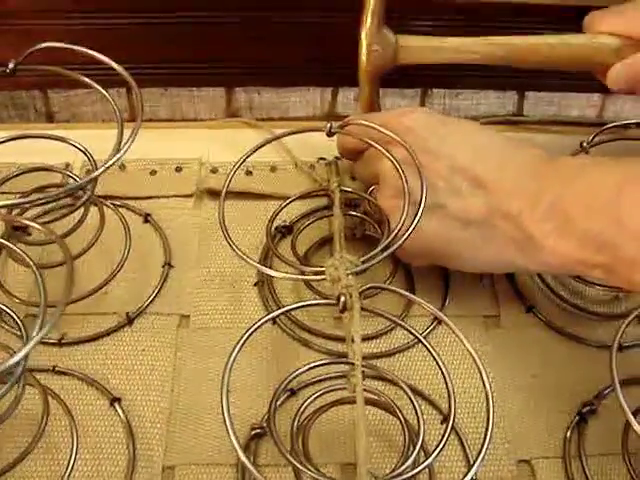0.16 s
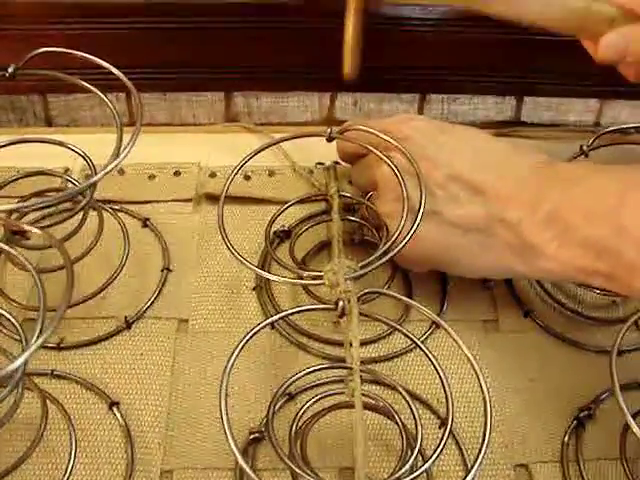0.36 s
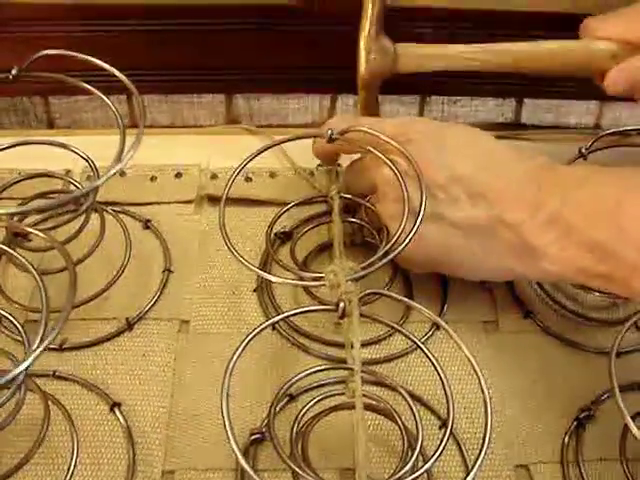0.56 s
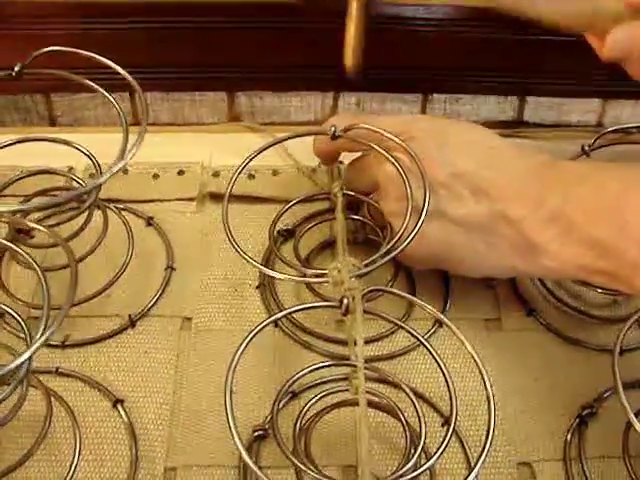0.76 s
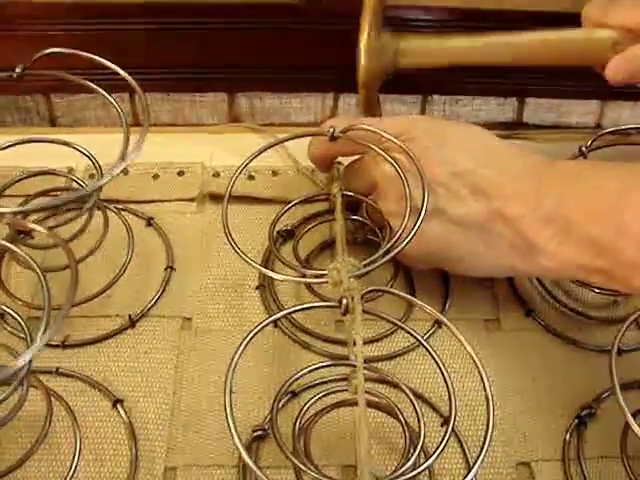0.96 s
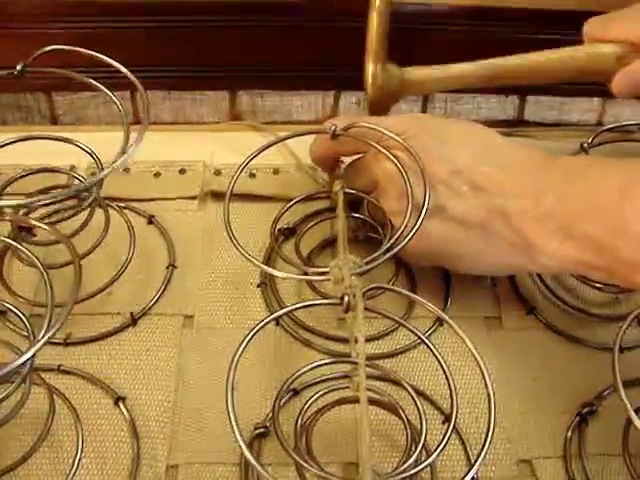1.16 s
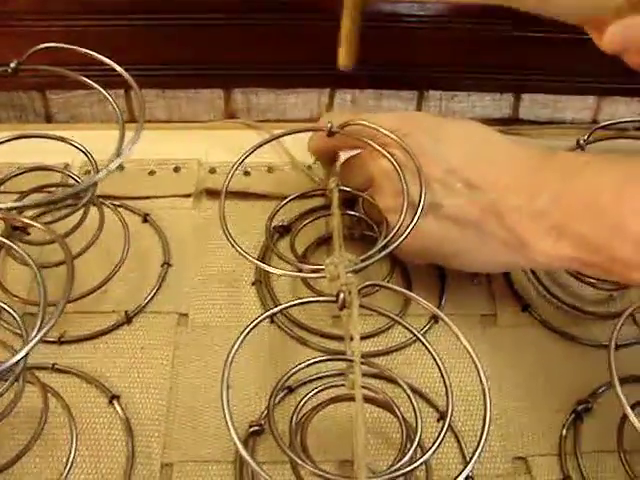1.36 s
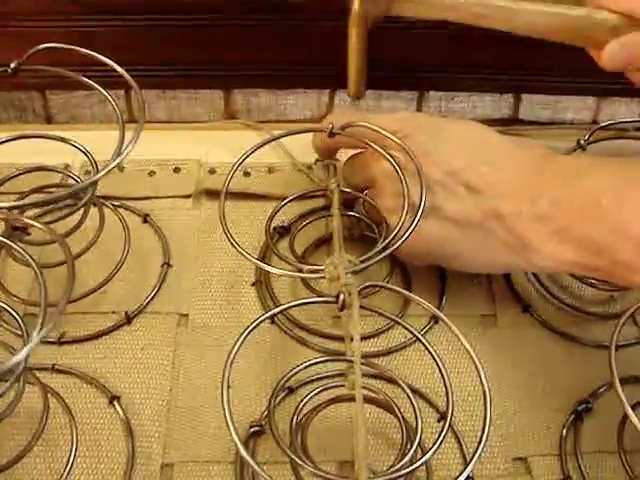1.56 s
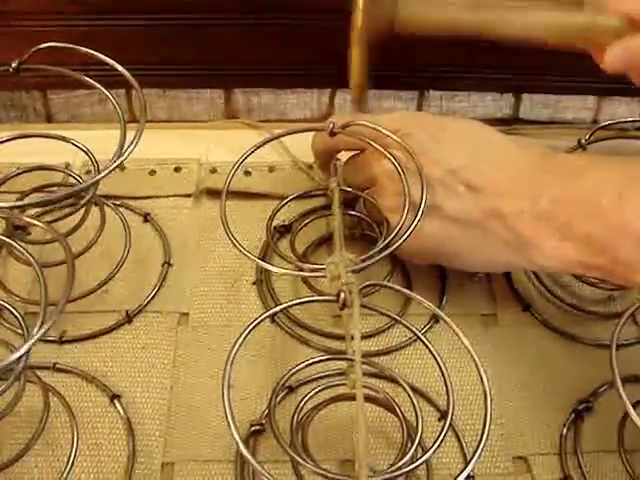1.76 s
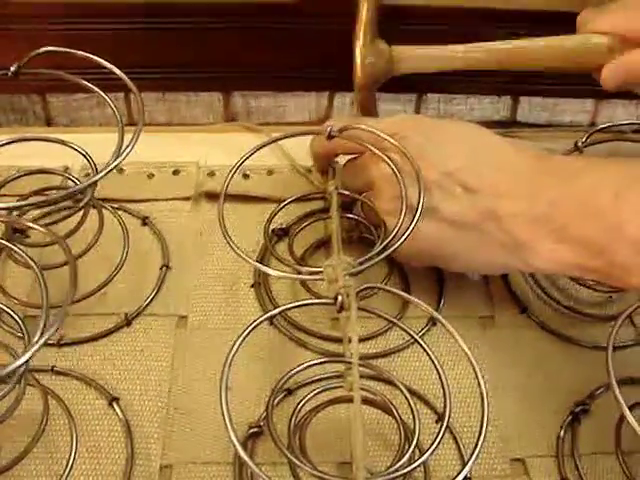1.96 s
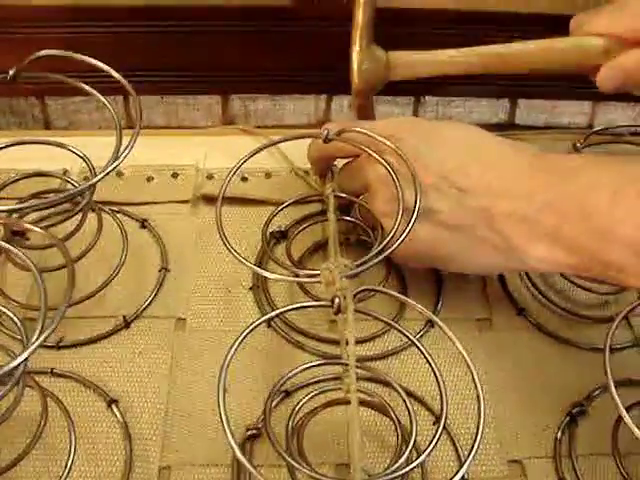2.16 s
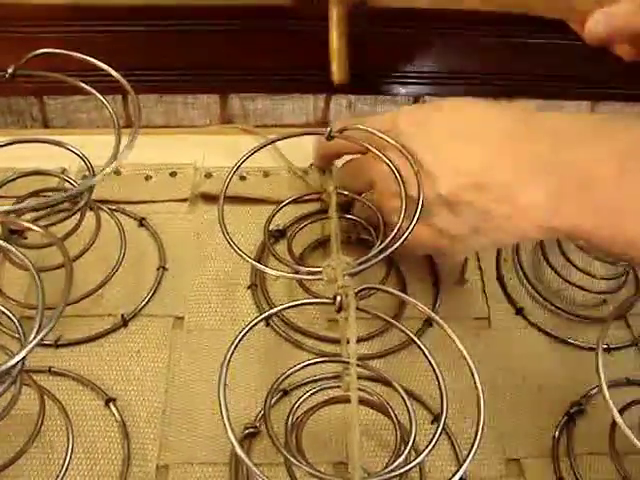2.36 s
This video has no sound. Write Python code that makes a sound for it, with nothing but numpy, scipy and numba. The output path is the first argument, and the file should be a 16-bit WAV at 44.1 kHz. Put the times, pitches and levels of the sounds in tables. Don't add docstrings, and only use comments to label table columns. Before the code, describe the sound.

A hammer drives a tack into a wooden frame with blows at about 0.2, 0.6, 1.0, 1.25, 1.75, 2.0 and 2.25 seconds, the third loudest. Each gives a steely crack, a quick rebound and a short hollow wooden ring. Coil springs hum and tick faintly between; something is lightly nudged near 1.5. Close, compressed camera sound with dull treble and low workshop hum.

```python
import sys
import numpy as np
from scipy import signal
from scipy.io import wavfile
from scipy.ndimage import uniform_filter1d, minimum_filter1d
from numba import njit

SR = 44100
rng = np.random.default_rng(int(sys.argv[2]) if len(sys.argv) > 2 else 0)


def master_out(mix):
    frames = np.transpose(np.atleast_2d(mix))
    ceiling = np.clip(frames, -1, 1)
    pcm = np.round(ceiling * 32767).astype(np.int16)
    wavfile.write(sys.argv[1], SR, pcm)


def volts_from_decibels(level):
    exponent = np.asarray(level, float) / 20
    return 10 ** exponent


N = 109941

# [f/Hz, level/dB per Hz]
SHOP_SPECTRUM = [(18, -46), (30, -9), (101, -10), (325, 0), (468, -14.5), (742, -9.5), (859, -14.5),
                 (1870, -19), (10000, -33.5), (13000, -64.5), (22000, -120)]
# [f/Hz, level/dB, t60/s]
SPRING_MODES = [(264, -15.5, 1.), (325.8, 10, 0.97), (345, -4, 0.67), (616, -10, 2.1), (749, -2.5, 1.73),
                (766, -13, 0.8), (1122, -0.5, .9), (1320, -10, 1.7), (1550, -9.5, .9)]
# [t/s, level/dB]
TICK_TIMES = [(0.0392, -47.5), (0.0708, -43), (0.118, -55), (0.148, -49.5), (0.381, -56), (0.465, -50),
              (0.5022, -50), (0.5563, -60), (0.803, -52), (0.861, -47.5), (0.8942, -49.5), (0.9243, -46),
              (1.179, -43), (1.41, -50), (1.487, -51), (1.6024, -48.5), (1.6636, -60), (1.912, -63),
              (2.1337, -50), (2.202, -47), (2.423, -47)]
# [f/Hz, level/dB, t60/s]
TICK_MODES = [(1825, 3, .012), (2200, 0, .008), (2580, 1, .009), (2990, -2, .008), (3310, 3, .014)]
# [t/s, level/dB, bass level/dB, middle level/dB, treble level/dB]
HAMMER_BLOWS = [
    (0.2052, -12, 4, 2, -0.5),
    (0.6333, -9, 2, -3, -0.5),
    (0.9693, -7.5, -1.5, -3, -2.5),
    (1.247, -9, -3.5, 2.5, 0.5),
    (1.7398, -11.5, -2, 1, -3.5),
    (1.9921, -8.5, -2.5, -0.5, -1),
    (2.2446, -8.5, -4.5, -6, 1),
]
# [crack level/dB, echo delay t/s, echo level/dB]
BLOW_STRIKES = [
    (1.5, .019, -1),
    (1, .0175, -4),
    (-0.5, .017, -3),
    (-0.5, .016, -3.5),
    (4, 0.016, -9.5),
    (1, .018, -4),
    (-1, .0185, -3),
]
# [f/Hz, level/dB]
BLOW_FAVOURS = [
    [(711, -15.5), (851, -18), (1070, -20.5), (2100, -18)],
    [(581, -18.5), (1080, -13.5), (1290, -13), (1710, -21)],
    [(484, -16), (861, -13), (1080, -19.5), (1580, -20)],
    [(563.7, -12), (820, -11.5), (1537, -16), (705, -21)],
    [(568, -11), (820, -12), (1565, -8), (362.3, -19)],
    [(345, -9.5), (700, -11.5), (851, -10.5), (1230, -14)],
    [(861, -14), (1070, -15.5), (1290, -17), (1570, -10.5)],
]
# [delay t/s, width t/s, level/dB]
PRESSURE_PULSES = [
    (0, 0.00059, -2),
    (.0024, .0015, -1.5),
]
# [f/Hz, level/dB, t60/s]
CRACK_MODES = [(1600, 3, 0.038), (2702, 5, 0.036), (2157, -2.5, .03), (3520, -1.5, 0.04), (3887, -4, 0.034),
               (4910, -6.5, 0.024), (6360, -9, 0.025), (7830, -9, 0.018)]
# [f/Hz, level/dB, t60/s]
RAIL_MODES = [(120, -14.5, 0.21), (206.6, 3, 0.11), (259.3, 6, .17), (323.5, -2.5, 0.21),
              (360.6, 0.5, 0.13), (442, -5, 0.27), (556.6, -7.5, 0.26), (695.7, -2.5, 0.13),
              (834.3, -3.5, 0.18), (1026, -19, 0.35), (1076, -8, 0.22), (1297, -5, 0.14), (1520, -7.5, 0.2),
              (1560, -9.5, 0.23)]
# [f/Hz, level/dB per Hz]
TAIL_SPECTRUM = [(18, -60), (30, -57.5), (146, -6), (249, -7.5), (760, -4), (1000, -6.5), (1150, -10),
                 (1540, -8), (10000, -34), (13000, -87), (22000, -120)]
# [f/Hz, t60/s]
TAIL_DECAY = [(60, 0.51), (260, 0.33), (700, 0.24), (1840, 0.25), (4850, 0.19), (9000, .2)]
# [f/Hz, level/dB, t60/s]
HEAD_MODES = [(6330, -0.5, .02), (7640, -9, 0.01), (4700, -13, .01)]
# [delay t/s, level/dB]
HEAD_ECHOES = [
    (.007, -30.5),
    (.0132, -20),
    (.0158, -26),
]
# [t/s, level/dB, centre f/Hz, length t/s]
GLANCING_TOUCHES = [
    (0.24, -25, 7500, 0.003),
    (1.2402, -15.5, 4030, 0.0028),
    (1.2537, -21.5, 4950, 0.0014),
    (.6405, -29, 9500, .0015),
    (1.7470, -27.5, 5100, 0.0022),
    (2.0005, -23.5, 3100, 0.0021),
    (.9772, -35, 5900, 0.0018),
]
# [f/Hz, level/dB, t60/s]
NUDGE_MODES = [(814.9, 4, 0.079), (1200, -2.5, 0.065), (1466, 1.5, 0.078), (2210, 3, 0.022),
               (2770, 3, 0.015), (3990, -5, 0.008), (5700, -2, .012), (8900, -18, 0.0083)]
# [from t/s, to t/s]
HUSHES = [
    (0.1792, 0.2),
    (0.612, 0.63),
    (0.936, 0.9645),
    (1.2254, 1.2345),
    (1.7296, 1.7345),
    (1.98, 1.986),
    (2.232, 2.234),
]
# [from t/s, to t/s, above f/Hz]
TREBLE_HOLES = [
    (.2435, .2515, 6200),
    (.677, .683, 5500),
    (.712, .718, 5000),
    (.990, .998, 6500),
    (1.5305, 1.5475, 5600),
    (1.7935, 1.8010, 5000),
]

CRACK_DB, SNAP_DB, RAIL_DB, TAIL_DB, SPRINGS_DB, THUMP_DB = -4, -14.5, -7, -8.5, -32.5, -28


def curve(table, hz):
    points = np.array(table)
    return np.interp(np.log(hz), np.log(points[:, 0]), points[:, 1])


def bandpass(low_hz, high_hz, x):
    return signal.sosfilt(signal.butter(2, [low_hz, high_hz], "band", fs=SR, output="sos"), x)


def band(hz, size):
    return bandpass(hz / 2 ** (1 / 6), hz * 2 ** (1 / 6), rng.standard_normal(size))


def add(out, s, x):
    i = int(round(s * SR))
    if i < 0:
        x, i = x[-i:], 0
    out[i:i + len(x)] += x[:N - i]


def colour(hz, bass_db, mid_db, treble_db):
    return curve([(380, bass_db), (520, mid_db), (880, mid_db), (1050, 0), (1800, 0), (2800, treble_db)], hz)


def ring(modes, size, build_cycles=0., tone=(0, 0, 0)):
    t, m = np.arange(size) / SR, np.array(modes, float)
    chance = rng.standard_normal((len(m), 3))
    hz = (m[:, 0] * (1 + 0.00507 * chance[:, 0]))[:, None]
    gain = volts_from_decibels(m[:, 1] + 1.5 * chance[:, 1] + colour(m[:, 0], *tone))[:, None]
    decay = np.exp(-np.log(1000) * t / m[:, 2:])
    build = 1 - np.exp(-t * hz / (build_cycles + 1e-3))
    phase = 3 * min(build_cycles, 1) * chance[:, 2:]
    return (gain * decay * build * np.sin(2 * np.pi * hz * t + phase)).sum(axis=0) / 2


def contact(x, s):
    burst = rng.standard_normal(500) * np.exp(-np.arange(500) / SR / s)
    return signal.fftconvolve(x, burst / np.sqrt(np.sum(burst ** 2)))[:len(x)]


def shop():
    level_db, flicker_db, rumble_swell_db, swell_s = -49.5, 2.1, 4, 3.0
    out, swell = 0, np.cos(2 * np.pi * (np.arange(N) / SR - .4) / swell_s)
    for hz in 32 * 2 ** (np.arange(26) / 3):
        steps = np.repeat(rng.standard_normal(N // 1500 + 1), 1500)
        flicker = flicker_db * uniform_filter1d(steps, 1500)[:N]
        rumble = curve([(100, rumble_swell_db), (300, 0.013)], hz) * swell
        out = out + volts_from_decibels(curve(SHOP_SPECTRUM, hz) + flicker + rumble) * band(hz, N)
    return out * volts_from_decibels(level_db) / np.std(out)


def springs(build_cycles, tone=(0, 0, 0)):
    return volts_from_decibels(SPRINGS_DB) * ring(SPRING_MODES, 45000, build_cycles=build_cycles, tone=tone)


def ticks():
    out = np.zeros(N)
    for s, db in TICK_TIMES:
        add(out, s, volts_from_decibels(db + 3) * contact(ring(TICK_MODES, 3000), .0015))
    return out


def smear(size=400):
    growth_s = 0.0017
    bright = np.diff(rng.standard_normal(size + 1)) * 0.042
    middle = (band(2400., 900) + band(3300., 900) + band(1500., 900))[-size:] * 0.5
    return np.exp(-np.arange(size)[::-1] / SR / growth_s) * (bright + middle)


def push():
    t, pulses = np.arange(800) / SR, 0
    for late_s, width_s, db in PRESSURE_PULSES:
        pulses = pulses + volts_from_decibels(db) * np.sin(np.pi * np.clip((t - late_s) / width_s, 0, 1)) ** 2
    return signal.sosfilt(signal.butter(2, 260, "high", fs=SR, output="sos"), pulses)


def crack(tone):
    t, dwell_s, after_db = np.arange(3000) / SR, 0.0032, -12
    swell = 1 - np.exp(-t / 0.00044)
    bearing = volts_from_decibels(after_db) + np.exp(-(t / dwell_s) ** 4)
    return ring(CRACK_MODES, 3000, tone=tone) * swell * bearing


def snap(hz, length_s):
    t = np.arange(600) / SR
    hiss = bandpass(hz / 1.6, hz * 1.55, rng.standard_normal(600))
    return hiss / np.std(hiss) * np.exp(-(t / length_s) ** 2)


def rail(build_cycles, tone):
    return volts_from_decibels(RAIL_DB) * ring(RAIL_MODES, 15000, build_cycles=build_cycles, tone=tone)


def favoured(modes):
    return 2 * ring([(hz, db, 0.16) for hz, db in modes], 15000, build_cycles=1.6)


def thump():
    return volts_from_decibels(THUMP_DB) * ring([(56.7, 0, 0.13)], 15000) * 2


def tail(tone, size):
    t, out, build_s, build_cycles = np.arange(size) / SR, 0, 0.001, 2.9
    for hz in 40 * 2 ** (np.arange(25) / 3):
        build = 1 - np.exp(-t / (build_s + build_cycles / hz))
        decay = np.exp(-np.log(1000) * t / curve(TAIL_DECAY, hz))
        gain = volts_from_decibels(curve(TAIL_SPECTRUM, hz) + colour(hz, *tone))
        out = out + gain * build * decay * band(hz, size + 1500)[1500:]
    return out * 8


def head_echo():
    return contact(ring(HEAD_MODES, 2000), 0.00073) * 2


def hammer():
    out = np.zeros(N)
    add(out, -.25, volts_from_decibels(-4.5) * springs(8.))
    for blow, strike, favours in zip(HAMMER_BLOWS, BLOW_STRIKES, BLOW_FAVOURS):
        s, db, *tone = blow
        crack_db, slap_s, slap_db = strike
        level, sharp = volts_from_decibels(db), volts_from_decibels(db + crack_db)
        add(out, s - 400 / SR, volts_from_decibels(db - 7.5) * smear())
        add(out, s, sharp * push())
        add(out, s, sharp * volts_from_decibels(CRACK_DB) * crack(tone))
        add(out, s, sharp * volts_from_decibels(SNAP_DB) * snap(2020, 0.0042))
        add(out, s, level * rail(1., tone))
        add(out, s, level * favoured(favours))
        add(out, s, level * thump())
        add(out, s, level * volts_from_decibels(TAIL_DB) * tail(tone, 15000))
        add(out, s, level * springs(5.6, tone))
        for late_s, echo_db in HEAD_ECHOES:
            add(out, s + late_s, volts_from_decibels(db + echo_db) * head_echo())
        add(out, s + slap_s, volts_from_decibels(db + slap_db) * rail(0.97, tone))
    return out


def touches():
    out = np.zeros(N)
    for s, db, hz, length_s in GLANCING_TOUCHES:
        add(out, s - 400 / SR, volts_from_decibels(db + 5) * smear())
        add(out, s, volts_from_decibels(db) * snap(hz, length_s))
        add(out, s, volts_from_decibels(db - 11) * tail((-9, -9, 8), 4000))
    return out


def grit(size):
    t, scrape_s = np.arange(size) / SR, .005
    hiss = signal.lfilter([1, -1], [1, -.6], rng.standard_normal(size))
    return hiss * np.sqrt(t / scrape_s) * np.exp(-t / scrape_s)


def nudge():
    out, s, level_db = np.zeros(N), 1.5190, -41
    add(out, s - .004, volts_from_decibels(level_db + 1) * grit(2000))
    for late_s, db in (0, 0.5), (.0032, 1), (.008, -3):
        add(out, s + late_s, volts_from_decibels(level_db + db) * ring(NUDGE_MODES, 9000, build_cycles=0.28))
    add(out, s, volts_from_decibels(level_db - 3.5) * snap(3100, 0.0055))
    return out


def scene():
    return (shop() + ticks() + hammer() + touches() + nudge())[None]


@njit
def squeeze(x, top, power, attack, release):
    y, follower = np.empty(len(x)), 0.
    for i in range(len(x)):
        now = abs(x[i])
        follower += (now - follower) * (attack if now > follower else release)
        y[i] = x[i] * (top / follower) ** power if follower > top else x[i]
    return y


def hush(x):
    t = np.arange(N) / SR
    mute = sum((t > a) * (t < b) * 1. for a, b in HUSHES)
    mute = uniform_filter1d(uniform_filter1d(mute, 70), 70)
    bass = signal.sosfiltfilt(signal.butter(8, 894, fs=SR, output="sos"), x * mute)
    return x * (1 - mute) + volts_from_decibels(-9) * bass


def thin_treble(x):
    from_hz, share, wait_s, length_s = 4800, .5, .012, .075
    hz, t, z = signal.stft(x, SR, nperseg=512)
    late = t - np.array([blow[0] for blow in HAMMER_BLOWS])[:, None] - wait_s
    thinness = .08 + ((late > 0) * np.exp(-(late / length_s) ** 2)).sum(axis=0)
    patches = rng.random((22, len(t) // 2 + 1)).repeat(12, axis=0).repeat(2, axis=1)
    poor = patches[:len(hz), :len(t)] < share * thinness
    strongest = -minimum_filter1d(-np.abs(z), 15, axis=0)
    drop = poor & (np.abs(z) < .95 * strongest) & (hz[:, None] > from_hz)
    for a, b, edge_hz in TREBLE_HOLES:
        drop |= (t > a - .002) & (t < b + .002) & (hz[:, None] > edge_hz)
    return signal.istft(z * np.where(drop, .1, 1), SR, nperseg=512)[1][:N]


def roll_off(x):
    return signal.sosfilt(signal.butter(12, 10480, fs=SR, output="sos"), x)


def record(dry):
    limit_db, ratio, attack_s, release_s = -16, 2.5, .0035, .03
    x = squeeze(dry[0], float(volts_from_decibels(limit_db)), 1 - 1 / ratio, 1 / (attack_s * SR), 1 / (release_s * SR))
    ceiling = volts_from_decibels(-.5)
    x = ceiling * np.tanh(x / ceiling)
    x = hush(thin_treble(x))
    x = signal.sosfilt(signal.ellip(10, .3, 75, 10000, fs=SR, output="sos"), x)
    return roll_off(x[None])


dry = scene()
out = record(dry)
master_out(out)
```